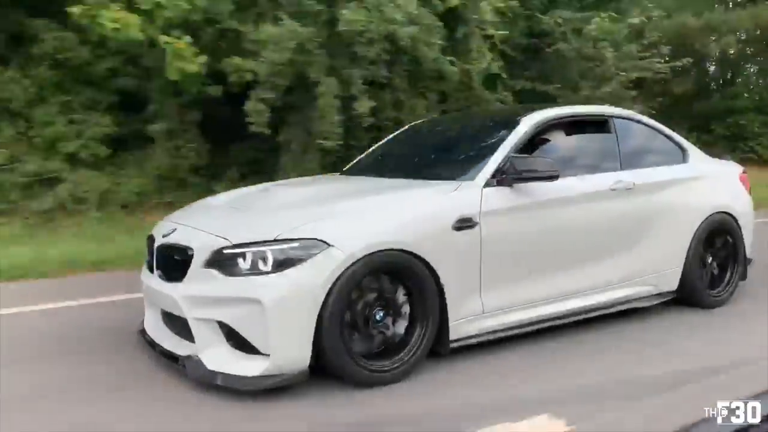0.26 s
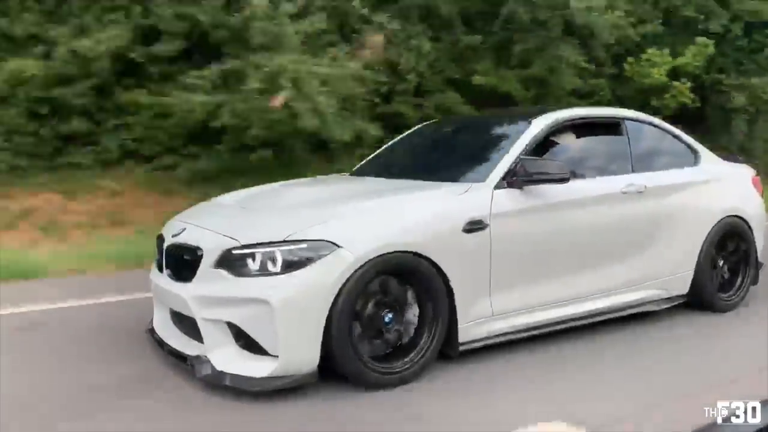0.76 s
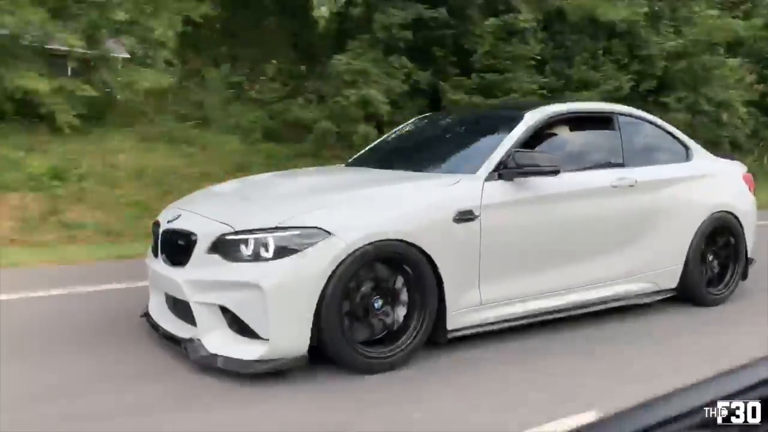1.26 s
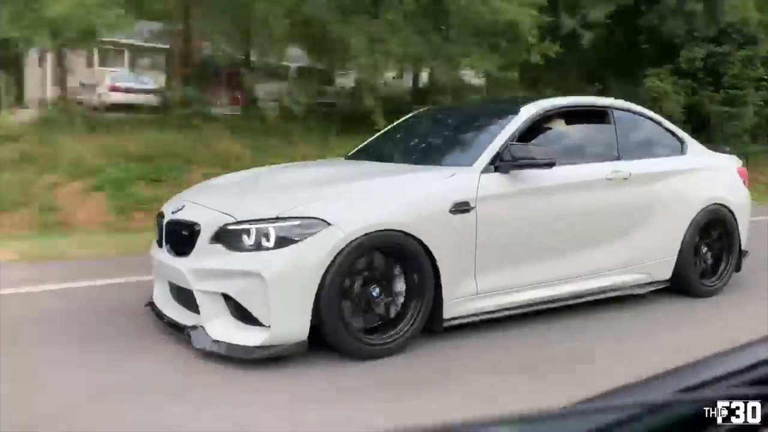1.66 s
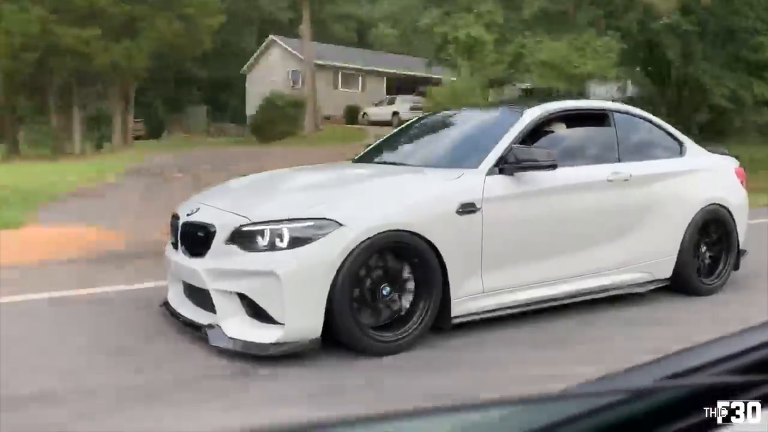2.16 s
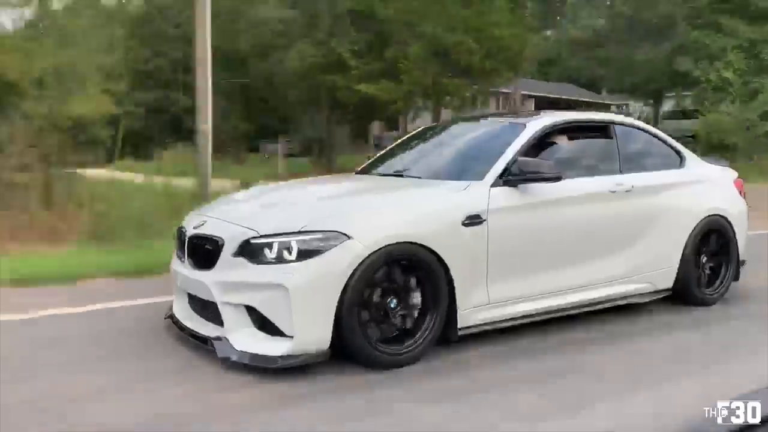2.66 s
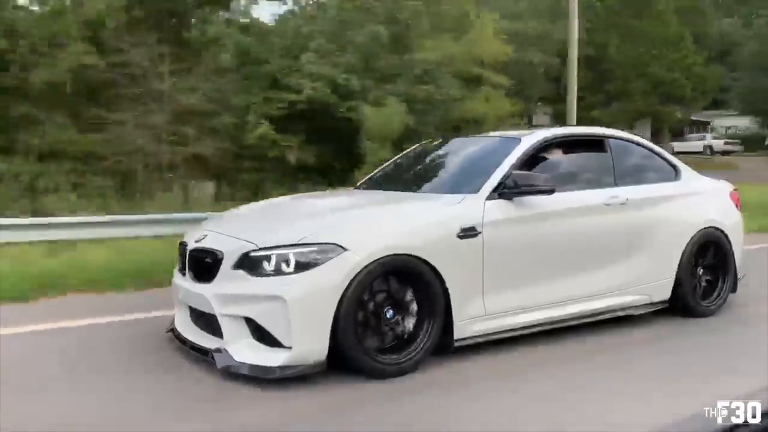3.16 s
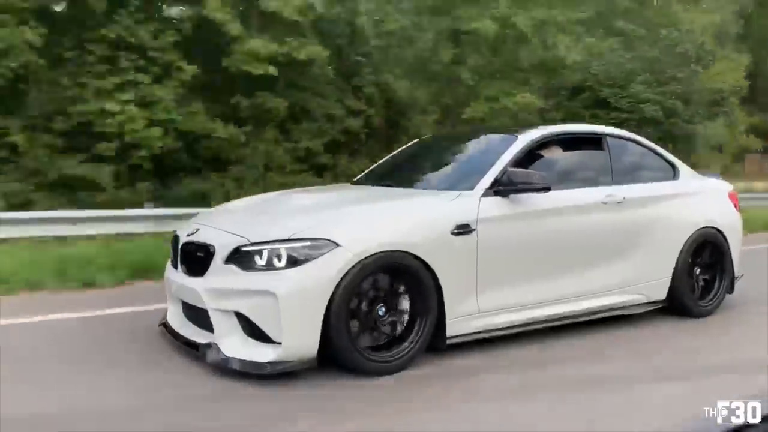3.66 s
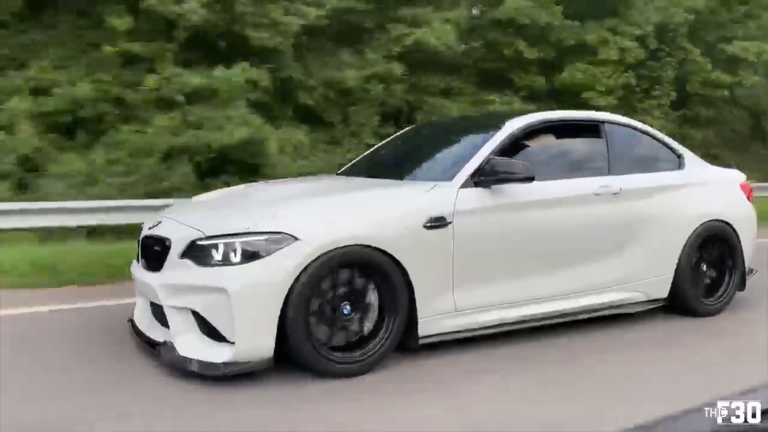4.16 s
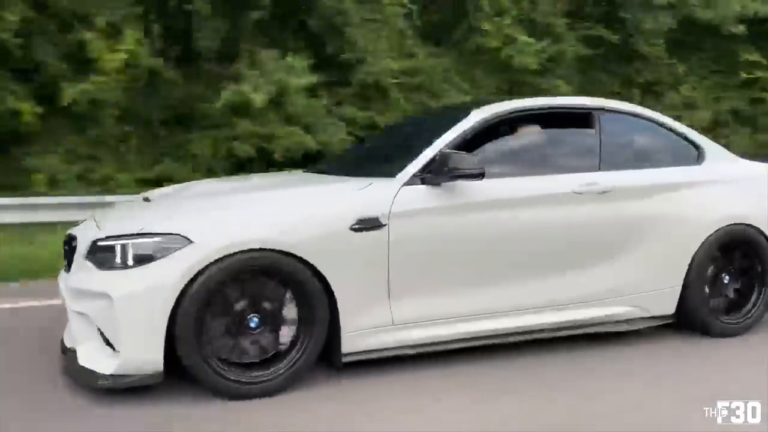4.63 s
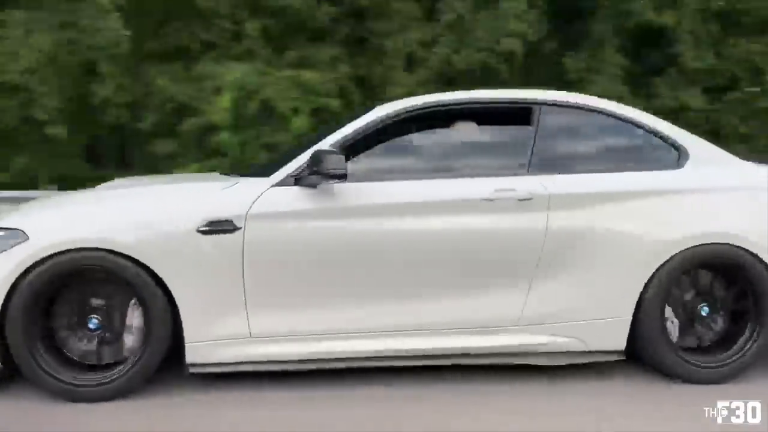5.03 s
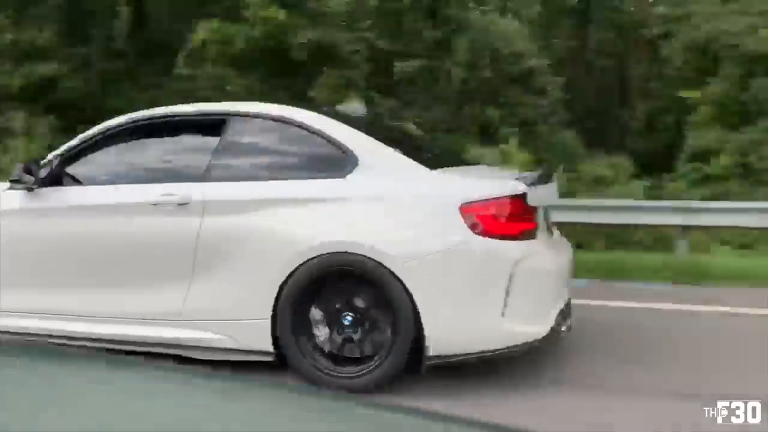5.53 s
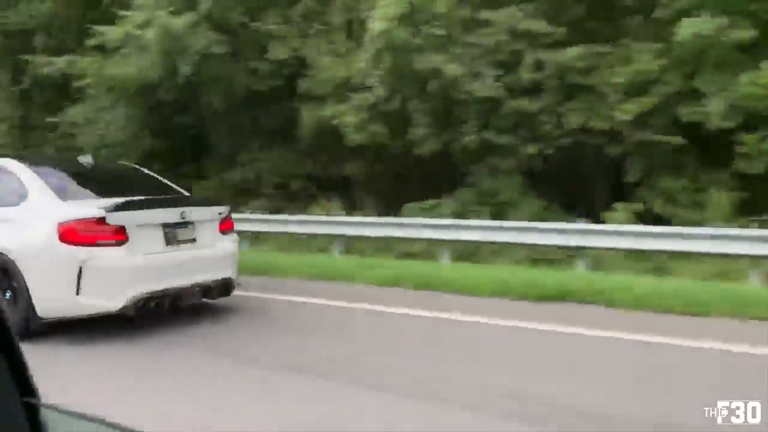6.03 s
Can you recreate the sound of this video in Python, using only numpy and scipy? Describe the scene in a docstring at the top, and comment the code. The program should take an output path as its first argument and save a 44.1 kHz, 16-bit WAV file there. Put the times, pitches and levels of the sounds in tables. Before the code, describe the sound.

Heard through an open window of a moving car: low buffeting wind, cabin boom, tyre roar and a steady drone. A coupe alongside pops irregularly, thickening into a rapid cluster of bangs. Then its turbo whistles upward, the six-cylinder engine swells into a rough climbing growl and buzz, and it draws past. The nearer car's own note rises, with sharp cracks at the end.

```python
"""Turbo car pulling past on a highway

A turbocharged six-cylinder coupe runs alongside, heard through the open window of a second car.
Off the throttle its exhaust pops (falling tones and noise bursts) over wind, tyre roar and cabin boom.
Then the turbo whistle climbs and the car pulls past: tones locked to the crank swell, with pulsed gas noise.
The nearer car drones throughout and adds a rough note late on; a few sharp cracks come at the end."""
import sys
import numpy as np
from scipy import signal
from scipy.io import wavfile
from scipy.ndimage import uniform_filter1d

SR = 44100
rng = np.random.default_rng(int(sys.argv[2]) if len(sys.argv) > 2 else 0)


def wav_out(sig):
    """Save sig, one row per channel (or a flat mono array), as 16-bit PCM at SR to the path in sys.argv[1]."""
    wavfile.write(sys.argv[1], SR, np.round(np.clip(np.atleast_2d(sig).T, -1, 1) * 32767).astype(np.int16))


N = 277509
TIME = np.arange(N) / SR

# Levels in these tables are starting points where a function adds a trim to the whole layer.
# wind at the open window: time_s, rumble_db, cabin_boom_db
WIND_CURVE = [(0.0, -28, -23.5), (0.8, -29.5, -25.5), (1.25, -25.5, -23), (1.7, -32, -19.5),
              (2.2, -29.5, -17), (2.8, -22.5, -22), (3.5, -28.5, -17.5), (4.3, -24, -25.5), (4.6, -21, -26),
              (4.95, -35.5, -20), (5.35, -33.5, -23), (5.65, -42.5, -27.5), (6.29, -33.5, -35.5)]
# tyres and air: time_s, tyre_roar_db, air_hiss_db
ROAD_CURVE = [(0.0, -36, -67.5), (2.1, -35.5, -64), (4.05, -31.5, -60), (4.65, -22.5, -50),
              (5.4, -26, -47.5), (5.85, -28, -40), (6.29, -25, -54.5)]
# spectra, only their shape matters: pitch_hz, level_db (per Hz)
WIND_SPECTRUM = [(20, -31), (35, -0.5), (50, 4), (80, 0), (120, -6), (170, -13.5), (260, -18.5), (400, -21),
                 (800, -50)]
TYRE_SPECTRUM = [(150, -0.5), (300, 3), (420, 2), (540, 4.5), (720, 6), (900, 6.5), (1300, 3), (1600, 0),
                 (2100, -2.5), (2800, -17), (4000, -15), (7000, -92), (10000, -89)]
HISS_SPECTRUM = [(2500, -25), (4700, -8), (6200, 1), (8200, -23), (10800, 5), (14300, -9.5), (16000, -9)]
GROWL_SPECTRUM = [(110, 12), (250, -20), (450, 26), (650, -21), (800, -18), (1100, -7), (1500, -9.5),
                  (1750, -11), (2200, -11), (3000, -21), (4500, 9)]
RASP_SPECTRUM = [(1500, -19), (2200, 18.5), (2900, 13), (3700, 12), (4700, 8), (6000, 15), (7300, -21),
                 (9000, -12), (15000, -63)]
# how alike the left and right channels are at each pitch: pitch_hz, likeness (1 = same, 0 = unrelated)
CHANNEL_LIKENESS = [(100, 1), (200, 1), (350, 0.98), (600, -0.21), (1200, 0.64), (2200, -0.12),
                    (5000, -0.032), (11000, -0.15)]
# drone of the cruise and hum of the tyre treads: pitch_hz, width_hz, level_db
CRUISE_DRONE = [(229.8, 1.47, -38), (290, 3.4, -41.5), (322, 13, -45), (904, 18, -64), (935, 29, -72),
                (1201, 79, -45)]
# engine speed: time_s, crank_turns_per_s
ENGINE_SPEED = [(0.0, 63.0), (3.5, 64.3), (4.05, 66.0), (4.6, 70.6), (4.72, 72.6), (5.45, 81.0),
                (5.95, 85.3), (6.1, 86.4), (6.29, 86.8)]
# tones at multiples of the crank speed swell, hold and fade under boost:
# multiple_of_crank_speed, cruising_db, full_db, full_from_s, hold_s, fade_db_per_s
CRANK_TONES = [(3, -37, -23, 4.72, 0.59, 8), (6, -54.5, -15, 4.75, 1.12, 44),
               (9, -77, -18.5, 4.86, 0.033, 33), (12, -52, -52, 5.6, 0.04, 67),
               (18, -76, -29.5, 5.334, 0.25, 133), (18, -64, -37.5, 5.98, 0.13, 23),
               (12, -85, -33, 5.1, 0.16, 62), (25, -85, -36, 4.74, 0.092, 80),
               (24, -85, -37.5, 4.93, 0.092, 70), (31, -85, -41.5, 4.76, 0.051, 100),
               (28, -85, -39.5, 5.25, .12, 80), (27, -85, -40, 5.42, 0.07, 62)]
# further tones at whole and half multiples of the crank speed:
# multiple_of_crank_speed, level_db (against the growl)
FURTHER_TONES = [(4.5, -15), (5, 2.5), (5.5, -1), (6.5, -7.5), (7, -7), (7.5, -7), (8, 2), (8.5, -4),
                 (11.5, -12), (12, -8.5), (13, -14), (13.5, -13), (15, -8.5), (18.5, -19)]
# exhaust pops, with times counted from each pop's start for the last two columns:
# start_s, thump_db, thump_crest_pitch_hz, crack_db, snap_db, crackle_crest_s, thump_crest_s
EXHAUST_POPS = [(0.02, -23, 315, -17.5, -36, 0.014, 0.0068), (0.217, -5.5, 284, -19.5, -33, 0.011, 0.011),
                (0.547, -5.5, 195, -25, -64, .006, 0.0098), (0.612, -26, 288, -19, -57, 0.0052, 0.0083),
                (0.732, -17.5, 244, -26, -60, .01, 0.0063), (1.123, -9.5, 208, -20, -56, .0071, 0.0086),
                (1.288, -5, 213, -14, -42, 0.027, 0.013), (1.406, -27, 302, -23, -45, .0033, 0.0079),
                (1.707, -6, 232, -20, -62, 0.0079, 0.0095), (1.843, -23, 300, -18.5, -50, 0.0046, 0.0053),
                (1.85, -14.5, 307, -15, -33.5, 0.019, 0.0092), (1.971, -19, 336, -21.5, -45, 0.006, .007),
                (2.222, -21, 293, -21.5, -61, .0033, 0.0065),
                (2.553, -4.5, 229.5, -13.5, -49, 0.014, 0.014), (2.598, -30, 303, -22, -52, .0018, .005),
                (2.626, -5, 251, -16, -36, 0.024, 0.0078), (2.637, -12, 258, -18, -37, .004, 0.0061),
                (2.642, -3, 253, -15.5, -46, 0.012, 0.0099), (2.691, -3.5, 248, -17, -27, 0.0022, 0.0086),
                (2.698, -10, 150, -13.5, -28, 0.0035, 0.0091), (2.741, -27, 300, -21, -48, 0.0018, 0.0054),
                (2.79, -5.5, 184, -18.5, -38.5, 0.033, 0.0108), (2.814, -15, 280, -19, -44, .005, 0.0083),
                (2.849, -2, 211, -17, -33, 0.008, 0.0094), (2.858, -25, 201, -12.5, -27.5, 0.016, .008),
                (2.876, -3, 194, -17.5, -41, 0.0092, .011), (2.958, -7, 180, -22, -50, .017, 0.011),
                (2.972, -19, 201, -22.5, -45, .005, 0.01), (2.987, -15, 283, -21, -52, 0.0049, 0.0067),
                (3.064, -15, 192, -15.5, -44, .011, .009), (3.262, -36, 297, -24, -56, .003, 0.0054),
                (3.399, -31, 270, -23, -55, .004, 0.0049), (3.729, -5, 131, -19.5, -49, 0.0045, 0.011),
                (3.798, -9, 112.5, -29, -57, .008, 0.013), (3.853, -12.5, 240, -33, -52, .008, 0.0093),
                (3.977, -11.5, 173, -20.5, -60, 0.0043, .009), (4.098, -10, 110, -22, -56, .006, 0.0088),
                (4.544, -12, 200, -18.5, -31, .004, 0.01), (4.565, -16.5, 294, -12, -37, 0.0052, 0.0094),
                (4.626, -17, 298, -14.5, -50, 0.0036, 0.0089), (6.224, -17, 580, -26, -13, 0.0056, 0.0053),
                (6.233, -19, 540, -15, -26, 0.0085, 0.0093), (6.259, -18, 496, -32, -25, .005, .007),
                (6.273, -13, 479, -15, -10.5, .015, .009)]
# tyre treads singing on changing asphalt: loudest_s, spread_s, pitch_hz, glide_hz_per_s, width_hz, level_db
TREAD_SONGS = [(0.95, 0.24, 1350, 139.5, 6.5, -48), (2.2, 0.43, 931, 1.5, 10, -42.5),
               (3.53, 0.17, 849, 21.5, 3.6, -37.5), (3.55, 0.2, 908, 128, 11, -39.5),
               (4.2, 0.18, 1010, 151, 7.4, -36.5), (4.4, 0.28, 1104, 90, 5.6, -36)]
# slaps of wind: centre_s, level_db, pitch_hz
WIND_SLAPS = [(1.029, -19, 105), (4.029, -11, 75.4), (4.118, -23, 65), (4.249, -11, 55), (4.508, -10.5, 81),
              (4.532, -8, 65), (4.572, -10, 79.4), (5.4, -12, 94), (5.837, -18.5, 135), (6.003, -15.5, 135),
              (6.088, -20, 176)]
# narrow resonances as the car draws past, and in the last row a band of noise from the nearer car: loudest_s,
# spread_s, pitch_hz, glide_hz_per_s, width_hz, level_db
PASSING_HOWLS = [(4.58, 0.06, 2120, 199.5, 30, -36), (4.8, 0.066, 2680, 400, 37.04, -37.5),
                 (5.02, 0.052, 2700, -750, 46.3, -35), (5.28, 0.027, 3130, -200, 40, -40),
                 (5.26, .025, 6400, 4, 120, -36), (5.49, 0.17, 2800, -220, 55.56, -34.5),
                 (5.58, 0.062, 1500, 99.5, 25, -27), (5.64, 0.037, 4620, -1200, 120, -28.5),
                 (5.65, 0.084, 7180, -900, 166.7, -36), (5.73, 0.045, 3350, -1500, 118.8, -38),
                 (5.89, 0.06, 4720, 3000, 110, -35), (5.96, 0.05, 5300, 2999, 140, -33.5),
                 (5.97, .04, 5950, 2998, 129.6, -35), (5.965, 0.061, 2970, 1500.5, 108, -25.5),
                 (6.11, 0.16, 4990, 36, 24, -39.5), (6.26, 0.045, 3320, 799, 83.33, -31.5),
                 (6.26, 0.063, 850, 0, 84, -25.5)]

# the tailpipes start behind and to the side of the microphone, then speed up past it
BEHIND_M, BESIDE_M, GO_S, ACCEL_M_PER_S2 = 2.6, 2.5, 4.4, 3.9
PIPE_HEIGHT_M, MIC_HEIGHT_M, SOUND_M_PER_S = 0.45, 1.34, 343
# the throttle opens, and boost follows
THROTTLE_S, THROTTLE_RISE_S, BOOST_S, BOOST_RISE_S = 4.34, 0.73, 4.49, 0.26
TONE_SWELL_DB_PER_S = 101
# the silencer cancels one pitch as a crank tone climbs through it
NULL_HZ, NULL_WIDTH_HZ, NULL_DB = 230.1, 3.9, -19.5
# gas noise with the pipes level with the microphone; before that the body hides some of the rasp
GROWL_DB, RASP_DB, SHADOW_DB, IN_VIEW_COS = -25, -29.5, 12, 0.38
# the whistle's pitch is halfway up at SPOOL_S; it is loudest at WHISTLE_S
SPOOL_S, SPOOL_TIME_S, IDLE_HZ, FULL_HZ = 4.555, 0.095, 8900, 14000
WHISTLE_S, WHISTLE_SPREAD_S, WHISTLE_DB = 4.52, 0.1, -42
# buzz of the engine bay: comes in with boost, bounces off the road, dies away as the car draws ahead
BUZZ_DB, BUZZ_ECHO_DB, BUZZ_RISE_S, BUZZ_AHEAD_LOSS_DB = -25.5, -2.5, 0.45, 13
# a crack's time to its crest, and the crackle that goes on after it, relative to the crack
CRACK_CREST_S, CRACKLE_DB = 0.003, -11.5
# while a thump swells, its pitch nears the end pitch: the gap shrinks by this factor
THUMP_FALL = 2.8
# uneven burning shakes the thump's pitch and the level of the noise bursts
THUMP_WOBBLE_DB, RAGGED_DB = 2.0, 4.0
BODY_DB = -9.5  # ring of the silencer, relative to the thump
CUTOFF_HZ, CEILING = 15900, 0.8  # top of the pitch range, and the level that rounded peaks stay under


def from_db(db):
    """Turn decibels into gain."""
    return 10 ** (np.asarray(db) / 20)


def rms_one(x):
    """Scale to an average power of 1."""
    return x / np.sqrt(np.mean(x ** 2) + 1e-20)


def in_time(rows):
    """Read each column of a curve at every sample."""
    s, *columns = np.transpose(rows)
    return [np.interp(TIME, s, column) for column in columns]


def at_hz(points, hz):
    """Read a spectrum on a log-frequency axis, as the ear spaces pitch."""
    table_hz, values = np.array(points).T
    return np.interp(np.log(hz), np.log(table_hz), values)


def angle(hz):
    """Add up a moving frequency into a running phase."""
    return 2 * np.pi * np.cumsum(hz) / SR


def band(x, low_hz, high_hz):
    """Keep mainly the sound between two pitches."""
    edges_hz = [low_hz, min(high_hz, SR / 2 - 500)]
    return signal.sosfilt(signal.butter(2, edges_hz, "band", fs=SR, output="sos"), x)


def ramp(start_s, rise_s):
    """Go from 0 to 1 in a straight line."""
    return np.clip((TIME - start_s) / rise_s, 0, 1)


def bloom(t, crest_s):
    """Swell to 1 at the crest, then die away."""
    return t / crest_s * np.exp(1 - t / crest_s)


def drift(rate_hz):
    """Wander slowly at random with power 1: smoothed noise, made at every 40th sample."""
    r = np.exp(-80 * np.pi * rate_hz / SR)
    noise = rng.standard_normal(N // 40 + 2002)
    slow = signal.lfilter([1], [1, -2 * r, r * r], noise)[2000:]  # drop the filter's start-up
    return np.interp(np.arange(N) / 40, np.arange(len(slow)), rms_one(slow))


def spread(mid, side, hz):
    """Mix a shared and an opposed signal so left and right are as alike as the table says."""
    alike = np.clip(at_hz(CHANNEL_LIKENESS, hz), -1, 1)
    shared = np.sqrt((1 + alike) / 2) * mid
    opposed = np.sqrt((1 - alike) / 2) * side * np.array([[1], [-1]])
    return shared + opposed


def turbulence(spectrum, patchy_db, flutter_hz):
    """Stereo noise in bands that flutter partly together, partly alone; power 1."""
    edges = 16 * 2 ** np.arange(0, 10.1, .4)
    out, together, white = 0, drift(flutter_hz), rng.standard_normal((2, 2, N))
    for k, (low, high) in enumerate(zip(edges, edges[1:])):
        hz = np.sqrt(low * high)
        if spectrum[0][0] <= hz <= spectrum[-1][0]:
            flutter_db = patchy_db * (together + drift(flutter_hz))
            gain = from_db(at_hz(spectrum, hz) + flutter_db)
            out = out + gain * spread(*band(white[k % 2], low, high), hz)
    return rms_one(out)


def wavering(phase, hz, rate_hz):
    """A tone that arrives over shifting paths, fading and turning in each channel."""
    c, s = np.cos(phase), np.sin(phase)
    mid = c * drift(rate_hz) + s * drift(rate_hz)
    side = c * drift(rate_hz) + s * drift(rate_hz)
    return spread(mid, side, hz)


def gliding(rows):
    """Noisy resonances that each swell and fade while their pitch slides."""
    out = 0
    for s, spread_s, hz, hz_per_s, width_hz, db in rows:
        swell = np.exp(-np.abs((TIME - s) / spread_s) ** 3 / 2)
        phase = angle(hz + hz_per_s * (TIME - s))
        out = out + from_db(db) * swell * wavering(phase, hz, width_hz)
    return out


def reflections(x, echo_db, count=4):
    """Road and car bodies return short echoes whose paths slowly change."""
    out = x.copy()
    for k in range(count):
        lag_s = .0021 * 1.6 ** k * (1 + 0.0734 * drift(0.374))
        echo = np.array([np.interp(TIME - lag_s, TIME, channel) for channel in x])
        out += from_db(echo_db) * echo
    return rms_one(out)


def wind(trim_db=6.5, gust_db=0.86):
    """Low turbulent noise at the open window, rising and falling in gusts."""
    rumble_db, _ = in_time(WIND_CURVE)
    level = from_db(rumble_db + trim_db + gust_db * drift(1.1))
    return level * turbulence(WIND_SPECTRUM, 1.43, 9.0)


def cabin_boom(trim_db=-1.0, pitch_hz=65.73):
    """Wind sets the cabin booming: a low tone with a wandering level and pitch."""
    _, boom_db = in_time(WIND_CURVE)
    level = from_db(boom_db + trim_db + 1.9 * drift(1.8))
    return level * np.sqrt(2) * np.sin(angle(pitch_hz + 1.87 * drift(5.8)))


def tyre_roar(trim_db=1.0):
    """Tyres roar on the road: fluttering noise with short reflections."""
    roar_db, _ = in_time(ROAD_CURVE)
    return from_db(roar_db + trim_db) * reflections(turbulence(TYRE_SPECTRUM, 1.3, 14.8), echo_db=-12.0)


def air_hiss(trim_db=12.5):
    """Rushing air hisses: fluttering high noise."""
    _, hiss_db = in_time(ROAD_CURVE)
    return from_db(hiss_db + trim_db) * turbulence(HISS_SPECTRUM, 1.0, 15)


def near_car_drone():
    """The nearer car and its tyre treads hum: steady tones blurred by slow changes of pitch and level."""
    out = 0
    for hz, width_hz, db in CRUISE_DRONE:
        phase = angle(hz * (1 + 0.00499 * drift(0.905)))
        out = out + from_db(db) * wavering(phase, hz, width_hz)
    return out


def crank_tones(speed, crank, high_speed, scatter_db=-9.0, scatter_hz=480.0, shake=0.09):
    """Tones at multiples of the crank speed; the higher one is, the more of it arrives over scattered paths."""
    out, strength = 0, 1 + shake * drift(56)  # the strength keeps shaking
    boost = ramp(BOOST_S, BOOST_RISE_S)
    for order, cruise_db, full_db, full_s, hold_s, fade_db_per_s in CRANK_TONES:
        swell_db = TONE_SWELL_DB_PER_S * np.maximum(full_s - TIME, 0)
        fade_db = fade_db_per_s * np.maximum(TIME - full_s - hold_s, 0)
        level_db = full_db - swell_db - fade_db
        null_db = NULL_DB * np.exp(-((order * speed - NULL_HZ) / NULL_WIDTH_HZ) ** 2)
        scattered = wavering(order * crank, order * high_speed, 10.6)
        scatter = from_db(scatter_db) * order * high_speed / scatter_hz
        loaded = np.sqrt(2) * np.sin(order * crank) + scatter * scattered
        cruising = from_db(cruise_db) * (1 - boost) * scattered
        out = out + from_db(null_db) * (cruising + from_db(level_db) * strength * loaded)
    return out


def burble(per_s=24.0, level_db=-35.0, crest_s=0.0012):
    """Small misfires crackle at random between the big pops, up to 4.5 s."""
    strength = from_db(3.0 * np.clip(rng.standard_normal(N), -2, 1.5))
    sparks = (rng.random(N) < per_s / SR) * (TIME < 4.5) * strength
    swell = signal.fftconvolve(sparks, bloom(TIME[:SR // 20], crest_s))[:N]
    noise = rms_one(spread(*band(rng.standard_normal((2, N)), 900, 1450), 840))
    return from_db(level_db) * swell * noise


def splutter(length, depth_db):
    """Burning comes in ragged spurts a few ms long; power 1."""
    smooth = uniform_filter1d(rng.standard_normal(length), size=110)
    spurts = rms_one(uniform_filter1d(smooth, size=50))
    return rms_one(from_db(depth_db * np.clip(spurts, -2, 2)))


def burst(envelope, noise):
    """Noise spluttering under an envelope, with the energy of that envelope."""
    shaped = envelope * splutter(len(envelope), RAGGED_DB) * noise
    return rms_one(shaped) * np.sqrt(np.mean(envelope ** 2))


def pop_thump(t, white, crest_hz, crest_s, end_hz=69.5, body_s=0.0069, boom_db=-13.0, boom_s=0.024):
    """A ragged tone falls quickly to the boom of the cabin, while the silencer rings briefly."""
    fall = THUMP_FALL ** (1 - t / crest_s)
    hz = (end_hz + (crest_hz - end_hz) * fall) * splutter(len(t), THUMP_WOBBLE_DB)
    swell = bloom(t, crest_s) ** 2 + from_db(boom_db) * bloom(t, boom_s)
    noise = band(band(white, 196.0, 710), 196.0, 710)
    body = burst(bloom(t, body_s), spread(*noise, 300))
    return swell * np.sin(angle(hz)) + from_db(BODY_DB) * body


def pop_crack(t, white, crackle):
    """A spluttering burst of middle-pitched noise, then gas that goes on crackling."""
    noise = band(band(white, 625, 1516), 460, 3270)
    envelope = bloom(t, CRACK_CREST_S) + from_db(CRACKLE_DB) * crackle
    return burst(envelope, spread(*noise, 770))


def pop_snap(t, white, crackle, crest_s=0.00098, tail_db=-14.0):
    """A very quick burst of high noise with a crackling tail."""
    noise = band(white, 3250, 4830) + 0.5 * band(white, 6000, 12500)
    envelope = bloom(t, crest_s) + from_db(tail_db) * crackle
    return burst(envelope, spread(*noise, 5000))


def pops(thump_trim_db=-5.0, crack_trim_db=-5.5, snap_trim_db=-2.0):
    """Fuel fires in the pipe: each pop mixes a thump, a crack and a snap."""
    t = np.arange(SR // 4) / SR
    out = np.zeros((2, N + len(t)))
    for s, thump_db, crest_hz, crack_db, snap_db, crackle_s, thump_s in EXHAUST_POPS:
        white = rng.standard_normal((3, 2, len(t)))
        crackle = bloom(t, crackle_s)
        pop = from_db(thump_db + thump_trim_db) * pop_thump(t, white[0], crest_hz, thump_s)
        pop = pop + from_db(crack_db + crack_trim_db) * pop_crack(t, white[1], crackle)
        pop = pop + from_db(snap_db + snap_trim_db) * pop_snap(t, white[2], crackle)
        at = round(s * SR)
        out[:, at:at + len(t)] += pop
    return out[:, :N]


def tread_tones():
    """Tyre treads sing on changing asphalt: narrow noisy tones that slide in pitch."""
    return gliding(TREAD_SONGS)


def buffets(duration_s=0.013, swing_s=0.006, swing_db=5.0, churn_db=-8.0):
    """Eddies slap the window opening: a brief swing of pressure inside a short churn."""
    swell, swing = 0, 0
    for s, db, hz in WIND_SLAPS:
        swell = swell + from_db(db) * np.exp(-((TIME - s) / duration_s) ** 2)
        wave = np.sin(2 * np.pi * hz * (s - TIME))
        swing = swing + from_db(db) * wave * np.exp(-((TIME - s) / swing_s) ** 2)
    churn = swell * rms_one(band(rng.standard_normal(N), 54, 201))
    return from_db(swing_db) * swing + from_db(churn_db) * churn


def passing():
    """Distance to the tailpipes (m) and the cosine of their bearing, positive once they are ahead."""
    ahead = ACCEL_M_PER_S2 * np.maximum(TIME - GO_S, 0) ** 2 / 2 - BEHIND_M
    distance = np.hypot(ahead, BESIDE_M)
    return distance, ahead / distance


def road_echo(x, echo_db, size=5):
    """The dull bounce off the asphalt lags most with the pipes closest, so its comb sweeps down and up again."""
    distance, _ = passing()
    lag_s = 2 * PIPE_HEIGHT_M * MIC_HEIGHT_M / distance / SOUND_M_PER_S
    bounce = [np.interp(TIME - lag_s, TIME, uniform_filter1d(channel, size=size)) for channel in x]
    return rms_one(x + from_db(echo_db) * np.array(bounce))


def exhaust_gas(crank, flow, facing, growl_trim_db=-5.0, pulsing=0.19, throb=0.13):
    """Gas rushes out in puffs: a low growl, and a rasp that comes out more as the pipes swing into view."""
    rasp_db = RASP_DB + SHADOW_DB * np.minimum(facing, IN_VIEW_COS)
    puffs = rms_one(1 + pulsing * np.cos(3 * crank) + throb * np.cos(crank))
    growl = road_echo(turbulence(GROWL_SPECTRUM, 1.2, 13), echo_db=-3)
    rasp = road_echo(turbulence(RASP_SPECTRUM, 1.6, 35), echo_db=-24.0)
    low_gas = flow * from_db(GROWL_DB + growl_trim_db) * growl
    high_gas = flow * from_db(rasp_db) * from_db([[-1.0], [1.2]]) * rasp  # left, right dB
    return puffs * (low_gas + high_gas)


def turbo(width_hz=91.0):
    """The compressor whistle climbs as boost builds, and is loudest a little before halfway up."""
    hz = IDLE_HZ + (FULL_HZ - IDLE_HZ) / (1 + np.exp((SPOOL_S - TIME) / SPOOL_TIME_S))
    swell = np.exp(-((TIME - WHISTLE_S) / WHISTLE_SPREAD_S) ** 2 / 2)
    return from_db(WHISTLE_DB) * swell * wavering(angle(hz), hz.mean(), width_hz)


def further_crank_tones(crank, high_speed, flow, trim_db=-3.0):
    """Wavering tones at whole and half multiples of the crank speed stand out once boost is up."""
    level = flow * from_db(GROWL_DB) * ramp(BOOST_S, BOOST_RISE_S)
    out = 0
    for order, level_db in FURTHER_TONES:
        out = out + from_db(level_db + trim_db) * wavering(order * crank, order * high_speed, 2.35)
    return level * out


def buzz(crank, facing, low_hz=960.0, high_hz=1900.0, change_hz=2.8, pulsing=0.27, alike=0.35, count=3, size=256):
    """The engine bay buzzes: rough patterns repeat every two turns, slowly change, and echo off the road."""
    place, grid, stack = crank / (4 * np.pi) % 1, np.linspace(0, 1, size), 0
    for patterns in rng.standard_normal((count, 2, size)):
        patterns = patterns + alike * np.roll(patterns, size // 2, axis=1)  # the two turns resemble each other
        layers = [np.interp(place, grid, pattern) * drift(change_hz) for pattern in patterns]
        stack = stack + np.array(layers)
    pulsed = stack * (1 + pulsing * np.cos(3 * crank))
    stereo = spread(*band(pulsed, low_hz, high_hz), 2240)
    level = ramp(BOOST_S, BUZZ_RISE_S) * from_db(BUZZ_DB - BUZZ_AHEAD_LOSS_DB * np.maximum(facing, 0))
    return level * road_echo(stereo, BUZZ_ECHO_DB)


def exhaust():
    """The passing car's crank tones, buzz and gas noise, all driven by one running crank angle."""
    (speed,), (distance, facing) = in_time(ENGINE_SPEED), passing()
    flow = ramp(THROTTLE_S, THROTTLE_RISE_S) * BESIDE_M / distance
    crank = angle(speed * (1 + .0015 * drift(25)))  # the speed jitters slightly
    high_speed = np.percentile(speed, 75)  # one speed to set each tone's stereo width and scatter
    tones = crank_tones(speed, crank, high_speed) + further_crank_tones(crank, high_speed, flow)
    return tones + buzz(crank, facing) + exhaust_gas(crank, flow, facing)


def howls():
    """Narrow resonances swell, glide and fade as the car draws past; the last row adds a band of noise from the
    nearer car."""
    return gliding(PASSING_HOWLS)


def near_car_note(level_db=-24.5, start_s=5.68, rise_s=0.24, start_hz=617.0, climb_hz_per_s=18.0, rough_db=3.0):
    """The nearer car's own rough firing note rises out of the noise: a shaky climbing tone and its half pitch."""
    hz = (start_hz + climb_hz_per_s * (TIME - start_s)) * (1 + 0.0042 * drift(19))
    phase = angle(hz)
    note = np.sin(phase) * from_db([[-7], [4.5]]) + 0.36 * np.sin(phase / 2)  # left, right dB
    rough = from_db(rough_db) * wavering(2 * np.pi * 660 * TIME, 610, 30.0)
    return from_db(level_db) * ramp(start_s, rise_s) * (np.sqrt(2) * note + rough)


def scene():
    """Both cars, the road and the wind."""
    road = wind() + cabin_boom() + tyre_roar() + air_hiss() + tread_tones() + buffets()
    passing_car = exhaust() + burble() + pops() + turbo() + howls()
    return road + passing_car + near_car_drone() + near_car_note()


def record(dry):
    """The loudest peaks are rounded and the top is cut."""
    rounded = dry / (1 + (dry / CEILING) ** 6) ** (1 / 6)
    return signal.sosfilt(signal.ellip(10, .1, 90, CUTOFF_HZ, fs=SR, output="sos"), rounded)


dry = scene()
out = record(dry)
wav_out(out)
```